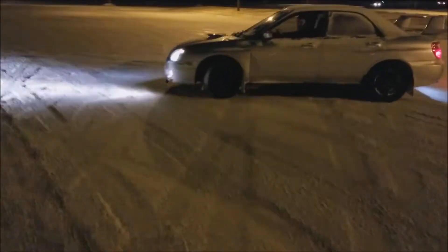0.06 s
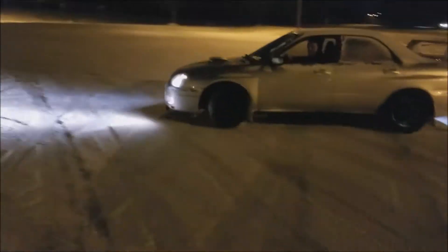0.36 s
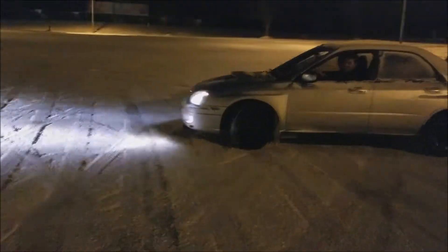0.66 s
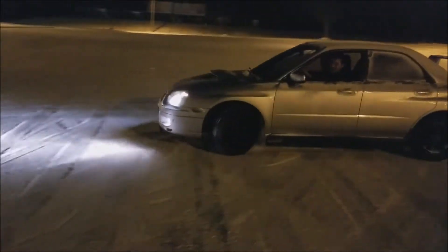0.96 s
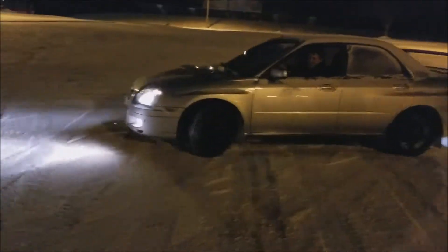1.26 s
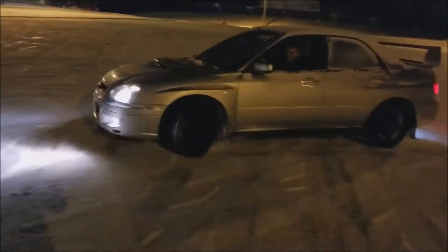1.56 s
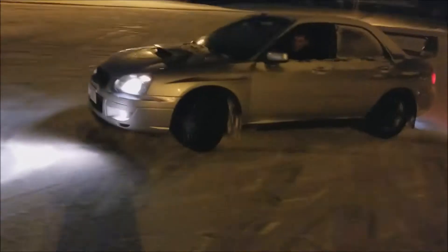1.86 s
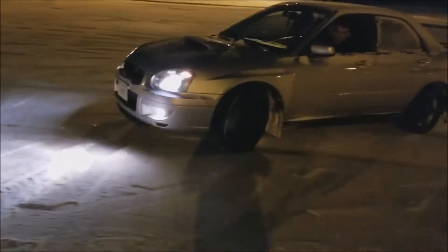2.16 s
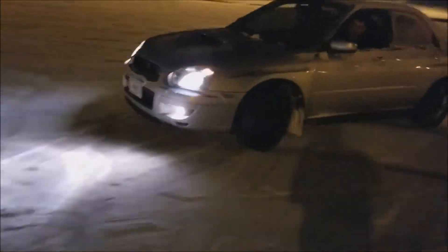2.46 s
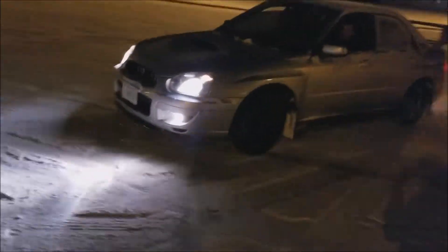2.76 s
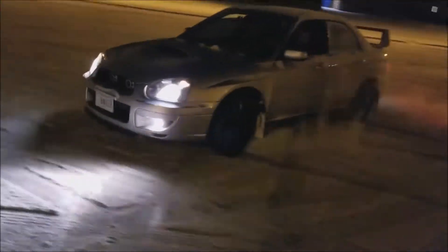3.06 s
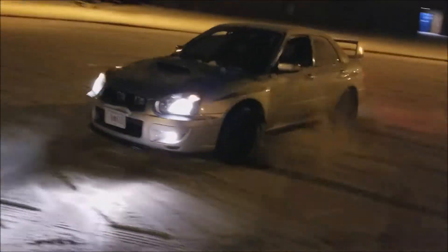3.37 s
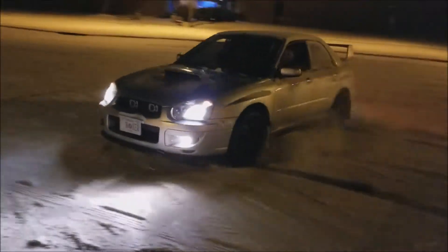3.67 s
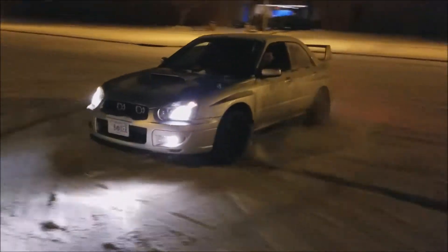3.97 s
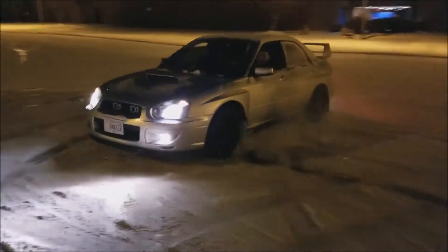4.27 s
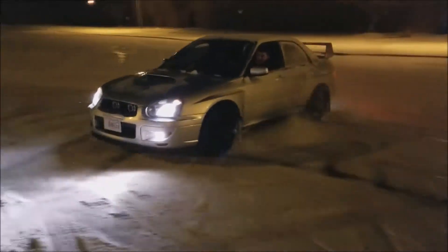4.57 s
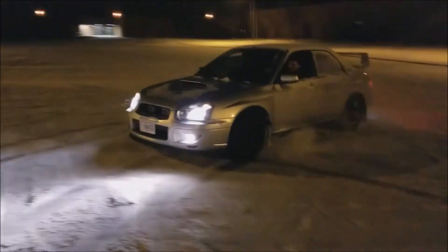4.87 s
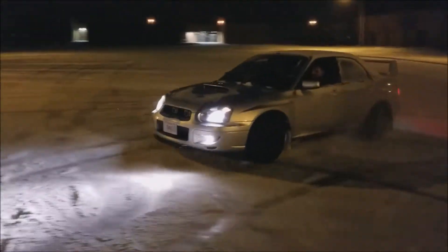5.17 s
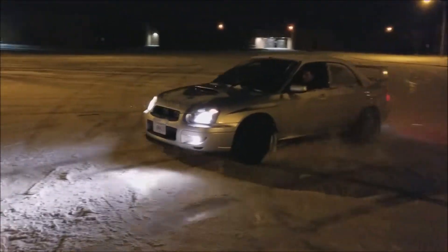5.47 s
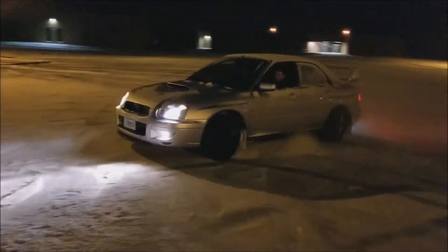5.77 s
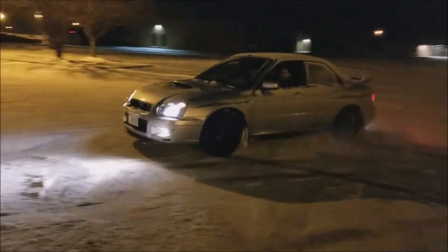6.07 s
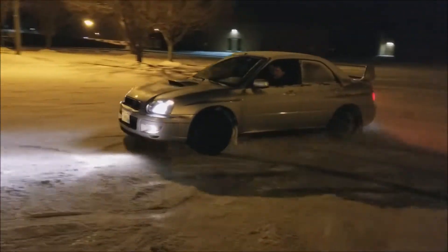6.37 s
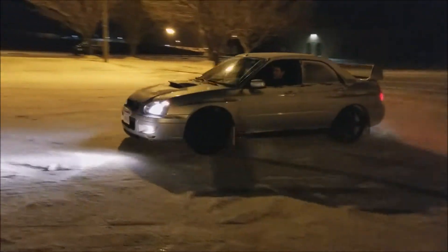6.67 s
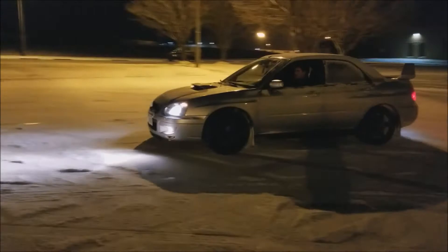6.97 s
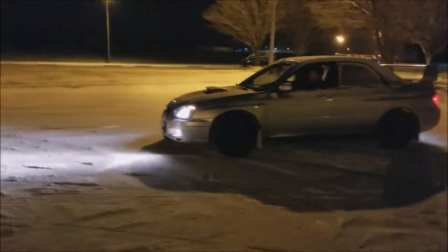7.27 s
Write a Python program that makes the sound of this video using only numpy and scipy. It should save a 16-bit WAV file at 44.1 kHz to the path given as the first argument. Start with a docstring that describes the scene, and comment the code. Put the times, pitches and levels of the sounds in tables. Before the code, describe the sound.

Heard from a few metres away in the open, with little echo, a car engine chugs and clatters at low speed before revving hard. The boomy, rasping exhaust rises and falls again and again, broken by short, hollow stutters, while the wheels spin and spray snow more quietly underneath. Finally the driver lifts off, a single exhaust pop sounds, and the engine winds down to a quieter burble.

```python
"""A snowy lot: a turbocharged flat-four car slides in circles, wheels spinning.
Its two cylinder banks reach the tailpipe by unequal paths, so the exhaust burbles; it rasps under load
and stumbles at each fuel cut. Engine clatter gives way to tyres churning and spraying snow, ice grit
snaps, the turbo whistles and blows off, and wheels and brakes ring faintly.
At last the throttle shuts with one bang of unburnt fuel and the revs sink."""
import sys
import numpy as np
from scipy import signal
from scipy.fft import rfft, irfft
from scipy.io import wavfile
from scipy.ndimage import uniform_filter1d, minimum_filter1d

SR = 44100
rng = np.random.default_rng(int(sys.argv[2]) if len(sys.argv) > 2 else 0)


def output_pcm(signal):
    """Save a mono or channel-first signal as 16-bit PCM at the path in sys.argv[1].

    Samples are clipped to [-1, 1] before scaling.
    """
    pcm = np.clip(np.atleast_2d(signal).T, -1, 1) * 32767
    wavfile.write(sys.argv[1], SR, np.round(pcm).astype(np.int16))


N = 322547
TIME = np.arange(N) / SR

# Engine speed: t/s, four-stroke cycle rate/Hz
REVS = [(0.0, 16.8), (0.17, 18.3), (0.38, 16.4), (0.78, 17.7), (0.95, 16.6), (1.18, 19.1), (1.56, 28.7),
        (1.79, 26.2), (2.1, 26.0), (2.21, 26.7), (2.38, 32.0), (2.45, 31.0), (2.66, 34.5), (2.89, 32.3),
        (3.06, 34.0), (3.27, 33.5), (3.39, 35.1), (3.73, 30.4), (4.04, 36.2), (4.31, 43.1), (4.58, 33.5),
        (4.91, 40.2), (5.14, 36.1), (5.39, 41.5), (5.58, 40.3), (5.84, 45.4), (5.92, 39.0), (6.21, 41.1),
        (6.53, 30.2), (7.31, 22.1)]
# The driver's foot and the exhaust's base mix: t/s, throttle/0-1, boom/dB, rasp/dB
THROTTLE = [(0, 0.2, -6.5, -30.5), (.25, 0.2, -7.5, -33), (.99, 0.16, -9, -35), (1.02, 0.37, -5.5, -22.5),
            (1.6, 0.5, -8, -23), (2.3, 1, -8.5, -28), (3.1, 1, -9, -27.5), (3.9, 0.94, -10, -24),
            (6.2, 0.96, -11, -27.5), (6.55, 0.1, -9, -26.5), (6.7, 0, -14.5, -38), (7.3, 0, -19, -49)]
# Cylinders in firing order: bank/+-1, pulse/dB, pulse in a fuel cut/dB
CYLINDERS = [(1, -2.1, -27.5), (1, -1.75, 3), (-1, 1, 1.5), (-1, 4, 1)]
# Single misfires: t/s, length/s
MISFIRES = [(1.764, .02), (1.991, .014), (2.422, .018), (2.845, .01), (5.836, .018)]
# Brief fuel cuts where the engine stumbles and the pipe hoots: t/s, length/s
FUEL_CUTS = [(3.47, .05), (4.335, 0.096), (4.952, .095), (5.435, 0.067), (5.841, .105), (6.227, 0.082),
             (6.518, 0.055)]
# Pipe resonance for the sum of the banks: f/Hz, gain/dB
PIPE_SUM = [(35, -58.5), (55, -46), (68, -23.5), (85, -12), (104, -10), (120, -16.5), (133, -20),
            (150, -12.5), (172, -6.5), (200, -16), (225, -13), (255, -11.5), (320, -19.5), (350, -31),
            (400, -40), (600, -98.5)]
# Pipe resonance for their difference: f/Hz, gain/dB
PIPE_DIFFERENCE = [(35, -59), (60, -48.5), (82, -24), (105, -20.5), (130, -23), (156, -9), (178, -10),
                   (205, -21), (240, -19), (275, -23), (320, -26.5), (385, -41.5), (600, -85.5)]
# Hollow hoot of the pipe starved by a fuel cut: f/Hz, gain/dB
PIPE_STARVED = [(40, -55.5), (75, -38.5), (98, -11.5), (118, -5), (145, -15.5), (190, -16), (230, -13),
                (280, -18), (400, -49.5)]
# Rasp of steep pulse fronts, sum of the banks: f/Hz, gain/dB
RASP_SUM = [(250, -62), (420, -38), (510, -23.5), (630, -21.5), (690, -37.5), (800, -40.5), (950, -37.5),
            (1150, -45), (2200, -65), (5000, -93.5)]
# The same rasp, difference of the banks: f/Hz, gain/dB
RASP_DIFFERENCE = [(250, -82), (390, -53), (455, -31), (550, -25), (620, -31.5), (720, -24.5), (880, -35),
                   (1150, -58.5), (2200, -67.5), (5000, -106.5)]
# Shock fronts at low revs: f/Hz, gain/dB
SHOCK_EQ = [(300, -19), (430, -6), (560, -6.5), (720, 0), (930, -0.5), (1180, -26), (1500, -13.5),
            (2200, -14.5), (2600, -23), (4000, -46.5)]
# Wheel spin, the fader that clatter, snow, turbo and metal ring ride on: t/s, level/dB
WHEEL_SPIN = [(0, -33), (.22, -45), (.65, -38), (.92, -41.5), (1.1, -32.5), (2.1, -34.5), (2.65, -30),
              (4.2, -26), (6.3, -27), (6.55, -32), (6.85, -47), (7.3, -54.5)]
# Tops of the surges, where the wheels flare and the turbo blows off: t/s, lift/dB
FLARES = [(1.6, 2.5), (2.44, 7.5), (2.73, 6), (3.07, 2.5), (3.45, 6.5), (4.35, 8), (4.93, 7), (5.45, 5),
          (5.87, 6), (6.25, 2.5)]
# Engine-bay clatter: f/Hz, gain/dB
CLATTER_EQ = [(500, -13.5), (900, 4.5), (1180, -7), (1500, 1), (1850, -2.5), (2200, 0.5), (2550, -8.5),
              (2950, -8.5), (3800, -30), (7000, -44.5)]
# Hiss of flung snow: f/Hz, gain/dB
SPRAY_EQ = [(1800, -27), (3300, 2.5), (4200, -0.5), (6000, -1.5), (7300, -6), (8700, -11.5), (10500, -10),
            (16000, -26)]
# The turbo's rush of air: f/Hz, gain/dB
AIR_EQ = [(7000, -33.5), (9000, -17), (10000, -11), (11300, -10), (12300, -0.5), (13500, -4.5), (16000, -2)]
# Low background rumble: f/Hz, gain/dB
RUMBLE_EQ = [(20, -6), (45, -10), (200, -3), (600, -20.5)]
# Stereo width of the noise beds: f/Hz, left-right correlation (clipped to +-1 in use)
EAR_LIKENESS = [(100, -6.5), (500, 0.63), (1000, 0.48), (2000, 0.38), (4000, -0.02), (12000, 0)]
# Pan of the noise beds: f/Hz, left minus right/dB
EAR_BALANCE = [(500, 5), (1400, -4), (3000, -1), (8000, -0.5), (13000, 1.5)]
# Ice grit under the tyres: t/s, relative level/dB, ring f/Hz, decay/s
GRIT_SNAPS = [(0.59, -17.5, 2300, .014), (1.181, -21, 2180, 0.014), (1.395, -21.5, 2150, .05),
              (6.709, -35, 3503, 0.0033), (6.908, -29.5, 4640, .001), (6.975, -34, 3160, .002)]
# Churned snow: f/Hz, gain/dB
CHURN_EQ = [(250, -10.5), (420, -6), (650, 2), (900, 0), (1120, -3), (1380, 1), (1750, -6.5), (2150, -6),
            (2550, -16), (3100, -17), (4200, -40), (8000, -55)]
# A tyre bites through to the ice and scrapes: t/s, lift/dB
SCRAPES = [(2.57, 5.5), (2.72, 1.5), (2.95, 4.5), (3.22, 4), (3.63, 5.5), (3.9, 2), (4.9, 5)]
# Ringing modes of wheels and brakes: f/Hz, bandwidth/Hz, relative level/dB
METAL_MODES = [(2000, 45, -23), (3200, 55, -30.5)]
# Afterfire bang in the pipe: f/Hz, gain/dB
BANG_EQ = [(100, 3), (300, 1), (700, 8), (1000, -4.5), (1600, -14), (2700, -22), (3600, -29), (7000, -28),
           (9000, -42), (16000, -33)]


def from_db(db):
    """Decibels to gain."""
    return 10 ** (np.asarray(db) / 20)


def unit_rms(x):
    """Scale to unit power."""
    return x / np.sqrt(np.mean(x ** 2) + 1e-20)


def automation(rows):
    """Each column of a timed table, drawn out to every sample."""
    times, *columns = np.transpose(rows)
    return [np.interp(TIME, times, column) for column in columns]


def at_hz(points, hz):
    """Read a curve on a log-frequency axis."""
    f, value = np.transpose(points)
    return np.interp(np.log(hz + 1e-3), np.log(f), value)


def drift(rate_hz):
    """A random wobble of unit power."""
    knots = rng.standard_normal(3200)
    return unit_rms(np.interp(TIME * rate_hz * 2, np.arange(len(knots)), knots))


def swell(t, width_s):
    """A smooth hump of height 1 around a moment."""
    return np.exp(-((TIME - t) / width_s) ** 2)


def within(t, spans):
    """Whether each moment lies in one of the spans (start, length)."""
    return sum((t > start) & (t < start + length) for start, length in spans) > 0


def clicks(at, sizes):
    """A train of one-sample pulses."""
    return np.bincount(at, sizes, N)


def crack(t, decay_s):
    """A click and a dying noise tail of equal energy."""
    age = TIME - t
    tail = rng.standard_normal(N) * (age >= 0) * np.exp(-np.abs(age) / decay_s)
    return tail / np.sqrt(np.sum(tail ** 2)) + clicks([int(t * SR)], [1])


def resonate(x, eq, size=16384, skirt_db=-40):
    """Minimum-phase EQ: it rings only after the hit, and rolls off beyond the curve's ends."""
    (low, low_db), (high, high_db) = eq[0], eq[-1]
    skirted = [(low / 2, low_db + skirt_db / 2), *eq, (high * 2, high_db + skirt_db)]
    gain = from_db(at_hz(skirted, np.arange(size // 2 + 1) * SR / size))
    cepstrum = irfft(np.log(gain))
    cepstrum[1:size // 2] *= 2
    cepstrum[size // 2 + 1:] = 0
    impulse = irfft(np.exp(rfft(cepstrum)))[:size // 2]
    return signal.fftconvolve(x, impulse)[:N]


def levelled(x, size=3600):
    """Ride the running power to 1, keeping the beat of the cylinders."""
    power = uniform_filter1d(uniform_filter1d(x ** 2, size), size)
    return x / np.sqrt(np.abs(power) + 1e-4 * np.mean(x ** 2))


def noise_bed(eq, flicker_db, flicker_hz):
    """Coloured stereo noise whose half-octave bands flicker; unit power in the centre."""
    bed, white, ears = 0, rng.standard_normal((2, 2, N)), np.array([[1], [-1]])
    edges = np.geomspace(20, 19000, 21)
    for k, (low, high) in enumerate(zip(edges, edges[1:])):
        if high > eq[0][0] and low < eq[-1][0]:
            hz, knots = np.sqrt(low * high), rng.standard_normal(2000)
            bandpass = signal.butter(2, [low, high], "band", fs=SR, output="sos")
            mid, side = signal.sosfilt(bandpass, white[k % 2])
            alike = np.clip(at_hz(EAR_LIKENESS, hz), -1, 1)
            band = np.sqrt(1 + alike) * mid + np.sqrt(1 - alike) * side * ears
            flicker = np.interp(TIME * flicker_hz * 2, np.arange(len(knots)), from_db(flicker_db * knots))
            pan = from_db(ears * at_hz(EAR_BALANCE, hz) / 2)
            bed = bed + flicker * band * pan
    bed = np.array([resonate(ear, eq) for ear in bed])
    return bed / np.sqrt(np.mean(bed.mean(axis=0) ** 2))


def firings(rough_db=1.63, cut_rough_db=4.0, misfire_db=-15, jitter_s=.00002, delay_cycles=.25):
    """Four exhaust pulses a cycle: their samples, strengths, banks, and whether the fuel is cut."""
    cycles = np.cumsum(automation(REVS)[0]) / SR - delay_cycles
    stroke = np.floor(len(CYLINDERS) * cycles).astype(int)
    due = np.flatnonzero(np.diff(stroke)) + 1
    t = TIME[due]
    bank, steady_db, cut_db = np.array(CYLINDERS)[(stroke[due] - 1) % len(CYLINDERS)].T
    rough, jitter = rng.standard_normal((len(t), 2)).T
    cut = within(t, FUEL_CUTS)
    level_db = np.where(cut, cut_db + cut_rough_db * rough, steady_db + rough_db * rough)
    level_db += misfire_db * within(t, MISFIRES)
    at = np.clip(((t + jitter_s * jitter) * SR).astype(int), 0, N - 1)
    return at, from_db(level_db), bank, cut


def engine_load(hard_climb_per_s=.3, lag_s=.016, boost_from_hz=35):
    """Boom and rasp faders in dB: the base mix, moved by pull, boost, fuel cuts and one bark."""
    revs, (_, boom_db, rasp_db) = automation(REVS)[0], automation(THROTTLE)
    climb = np.gradient(np.log(revs)) * SR
    pole = np.exp(-1 / (lag_s * SR))
    pull = signal.lfilter([1 - pole], [1, -pole], np.tanh(climb / hard_climb_per_s))  # -1 as revs fall
    boost = np.maximum(revs - boost_from_hz, 0)
    cut = uniform_filter1d(within(TIME, FUEL_CUTS).astype(float), 400)
    bark = swell(1.87, width_s=.091)  # just after the first misfire
    return (boom_db + 2 * pull + .3356 * boost + cut + 3 * bark,
            rasp_db + 2.5 * pull + .7 * boost - 7.5 * cut + 7.5 * bark)


def burble(at, strength, bank, sum_eq, difference_eq):
    """The banks' sum gives the firing note, their difference the odd orders that burble."""
    note = resonate(clicks(at, strength), sum_eq)
    odd_orders = resonate(clicks(at, strength * bank), difference_eq)
    return note + np.sqrt(2) * odd_orders


def shocks(boom, slope_exponent=.54, power_exponent=1.5, chug_phase_cycles=.66):
    """Strong falling swings in the pipe steepen into shocks, bunched at low revs into one chug a cycle."""
    slope, revs = np.diff(boom), automation(REVS)[0]
    at = np.flatnonzero((boom[:-1] > 0) & (boom[1:] <= 0))
    power = np.abs(uniform_filter1d(boom ** 2, 620))
    depth = np.interp(revs, [19, 25], [.95, .2])
    chug = 1 + depth * np.cos(2 * np.pi * (np.cumsum(revs) / SR - chug_phase_cycles))
    sizes = np.abs(slope[at] / slope.std()) ** slope_exponent * power[at] ** power_exponent * chug[at]
    return resonate(clicks(at, sizes), SHOCK_EQ)


def exhaust(at, strength, bank, cut, front_rough_db=2.54, muffle_hz=200):
    """Pulses boom in the pipe; the edge on top chugs with shocks at low revs and rasps at high revs."""
    throttle, revs = automation(THROTTLE)[0], automation(REVS)[0]
    hoot = resonate(clicks(at, strength * cut), PIPE_STARVED)
    pipe = burble(at, strength * ~cut, bank, PIPE_SUM, PIPE_DIFFERENCE) + hoot
    # a closing throttle rounds the pulses off
    muffled = signal.sosfiltfilt(signal.butter(2, muffle_hz, fs=SR, output="sos"), pipe)
    boom = levelled(throttle * pipe + (1 - throttle) * muffled)
    fronts = strength * from_db(front_rough_db * rng.standard_normal(N)[:len(at)])
    rasp = levelled(burble(at, fronts, bank, RASP_SUM, RASP_DIFFERENCE))
    shock_share = np.interp(revs, [20, 29], [.92, .04]) * np.minimum(throttle / .3, 1) ** 2
    edge = np.sqrt(shock_share) * levelled(shocks(boom)) + np.sqrt(1 - shock_share) * rasp
    boom_db, rasp_db = engine_load()
    return boom * from_db(boom_db), edge * from_db(rasp_db)


def spin_fader(trim_db, flare_share):
    """A gain that follows the wheel spin and swells at each flare."""
    flare_db = sum(db * swell(t, width_s=.11) for t, db in FLARES)
    return from_db(automation(WHEEL_SPIN)[0] + trim_db + flare_share * flare_db)


def engine_clatter(at, strength, depth=.35, puff_s=.0011):
    """Engine-bay noise throbs with each firing."""
    puffs = signal.lfilter([1], [1, -np.exp(-1 / (puff_s * SR))], clicks(at, strength) + 1e-18)
    throb = levelled(1 - depth + depth * unit_rms(puffs))
    clatter = noise_bed(CLATTER_EQ, flicker_db=3, flicker_hz=20)
    return clatter * throb * spin_fader(trim_db=-3, flare_share=.37)


def snow_spray():
    """Snow flung off the tyres: a bright, fluttering hiss."""
    hiss = noise_bed(SPRAY_EQ, flicker_db=1.8, flicker_hz=22)
    return hiss * from_db(.52 * drift(150)) * spin_fader(trim_db=-20, flare_share=.77)


def turbo_air():
    """A thin rush of air that swells as the turbo blows off."""
    return noise_bed(AIR_EQ, flicker_db=0, flicker_hz=45) * spin_fader(trim_db=-23.5, flare_share=1)


def rumble(level_db=-38.5):
    """A faint, uneven low bed under the car."""
    return from_db(level_db) * noise_bed(RUMBLE_EQ, flicker_db=4.5, flicker_hz=5.5)


def ice_grit(q=4.3, gain_db=18):
    """Bits of ice snap or crunch with a short ring."""
    return sum(signal.lfilter(*signal.iirpeak(hz, q, fs=SR), crack(t, decay_s) + 1e-18)
               * from_db(db + gain_db) for t, db, hz, decay_s in GRIT_SNAPS)


def snow_churn():
    """Spinning tyres churn the snow, jumping in level where they scrape on ice."""
    churn = noise_bed(CHURN_EQ, flicker_db=2, flicker_hz=22)
    scrape_db = sum(db * swell(t, width_s=.043) for t, db in SCRAPES)
    return churn * from_db(.86 * drift(70) + scrape_db) * spin_fader(trim_db=0, flare_share=.37)


def turbo_whistle(rest_hz=11700, rise_hz=2600, spool_s=.24, sag_s=.085, lead_s=.025, waver=.008):
    """The compressor's blade tone, heard at high revs, spools up towards each fuel cut and sags after."""
    ages = [TIME - start + lead_s for start, _ in FUEL_CUTS]
    boost = np.max([np.exp(-np.abs(age) / np.where(age < 0, spool_s, sag_s)) for age in ages], axis=0)
    hz = (rest_hz + rise_hz * boost) * (1 + waver * drift(120))
    tone = np.sin(2 * np.pi * np.cumsum(hz) / SR)
    gate = np.interp(automation(REVS)[0], [33, 37], [0, 1])
    shimmer = from_db(4 * np.array([drift(15), drift(15)]))  # each ear fades on its own
    return tone * gate * shimmer * spin_fader(trim_db=-30.5, flare_share=1)


def metal_ring(fade_in_s=(4.2, 5.6), spin_share=.75):
    """Wheels and brakes ring in narrow bands late in the slide, kept going by the wheel spin."""
    rings = 0
    for hz, width_hz, db in METAL_MODES:
        mode = signal.lfilter(*signal.iirpeak(hz, hz / width_hz, fs=SR), rng.standard_normal((2, N)))
        rings = rings + from_db(db) * unit_rms(mode)
    return rings * from_db(spin_share * automation(WHEEL_SPIN)[0]) * np.interp(TIME, fade_in_s, [0, 1])


def afterfire(t=6.6195, decay_s=.012, gain_db=18):
    """Unburnt fuel goes off in the pipe as the throttle shuts."""
    return from_db(gain_db) * resonate(crack(t, decay_s), BANG_EQ)


def lot_scatter(send, t60_s=.17):
    """A short, diffuse tail off the car body and snow banks, different at each ear."""
    age = TIME[:SR // 2]
    tail = rng.standard_normal((2, len(age))) * from_db(-60 * age / t60_s)
    return signal.fftconvolve(send[None], tail / np.sqrt(np.sum(tail ** 2) / 2), axes=1)[:, :N]


def scene():
    """The car a few metres off, on soft snow that reflects little."""
    at, strength, bank, cut = firings()
    boom, edge = exhaust(at, strength, bank, cut)
    bite = edge + afterfire() + ice_grit()
    direct = boom + bite
    # the tailpipe starts out to the right, so the left ear hears it late until the car swings round
    lag_s = np.interp(TIME, [2.1, 2.7], [.00025, 0])
    ears = np.array([np.interp(TIME - lag_s, TIME, direct), direct])
    ambience = lot_scatter(from_db(-20) * boom + from_db(-11) * bite) + rumble()
    crossfade = np.interp(TIME, [1.6, 2.7], [0, 1])  # clatter gives way to churn
    mids = np.sqrt(1 - crossfade) * engine_clatter(at, strength) + np.sqrt(crossfade) * snow_churn()
    return ears + ambience + mids + snow_spray() + turbo_whistle() + turbo_air() + metal_ring()


def record(dry, ceiling=1.0, window=441, fade_s=.004, cutoff_hz=15900):
    """A fast limiter holds the peaks; a steep low-pass trims the top."""
    gain = np.minimum(1, ceiling / (np.abs(dry).max(axis=0) + 1e-9))
    limited = dry * uniform_filter1d(minimum_filter1d(gain, window), window)
    fade_out = np.minimum(1, (TIME[-1] - TIME) / fade_s)
    return signal.sosfilt(signal.ellip(12, .1, 90, cutoff_hz, fs=SR, output="sos"), limited * fade_out)


dry = scene()
out = record(dry)
output_pcm(out)
```